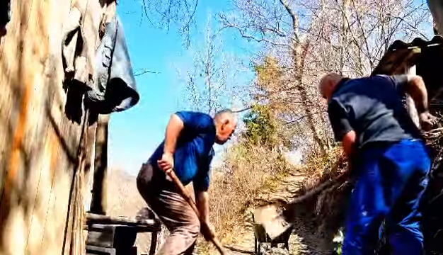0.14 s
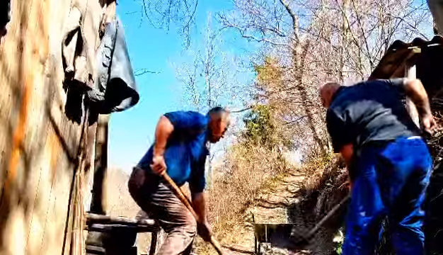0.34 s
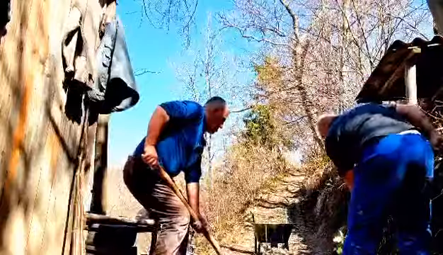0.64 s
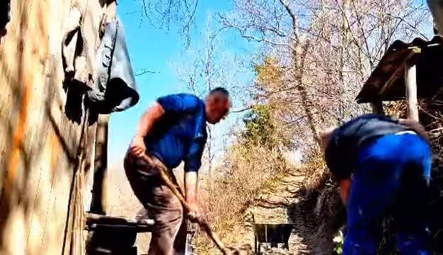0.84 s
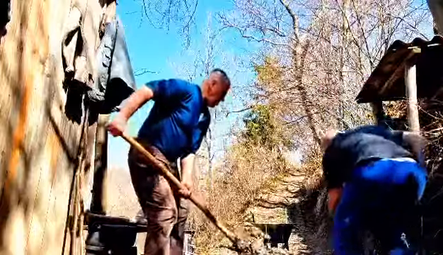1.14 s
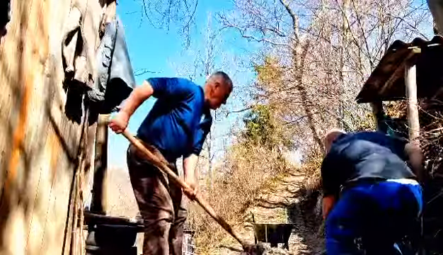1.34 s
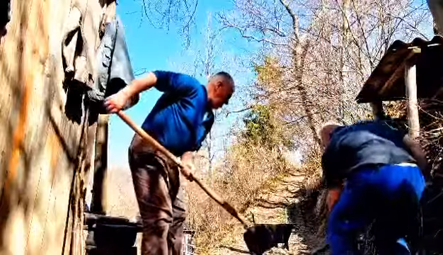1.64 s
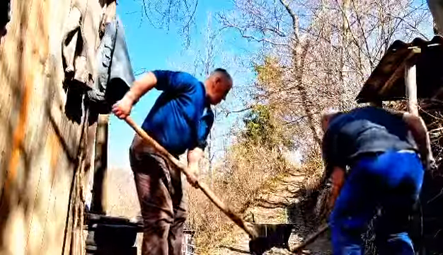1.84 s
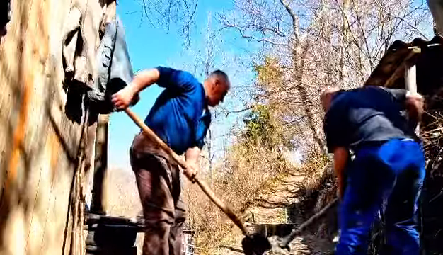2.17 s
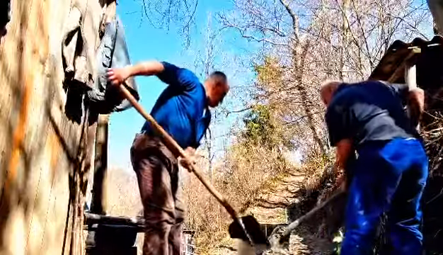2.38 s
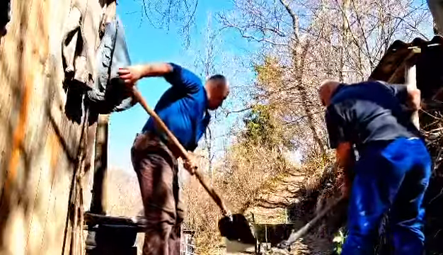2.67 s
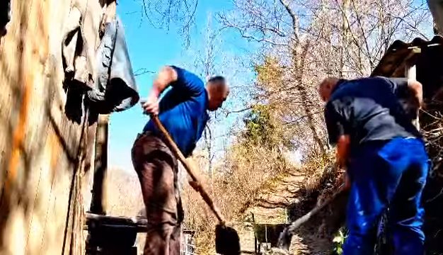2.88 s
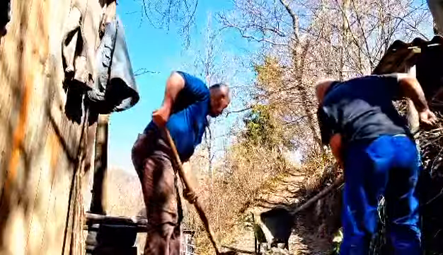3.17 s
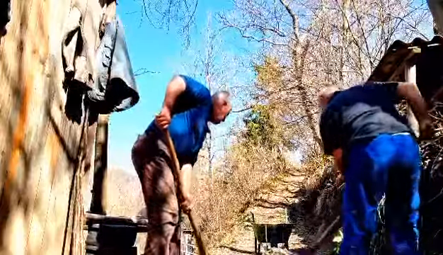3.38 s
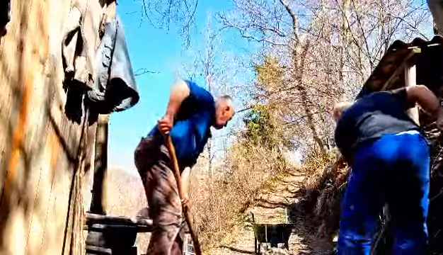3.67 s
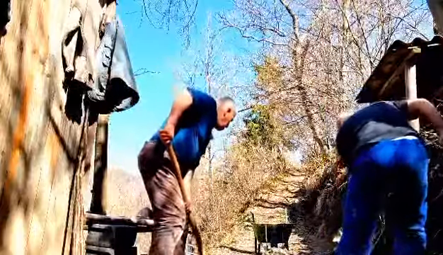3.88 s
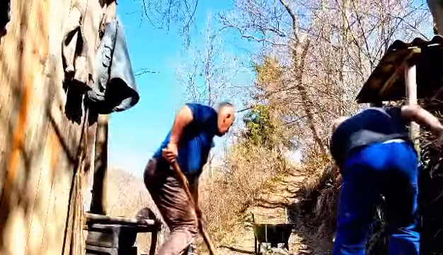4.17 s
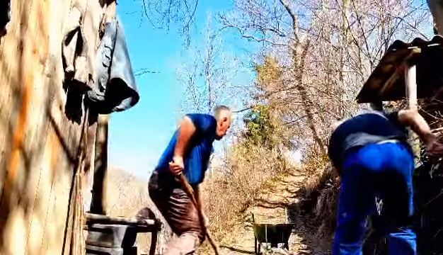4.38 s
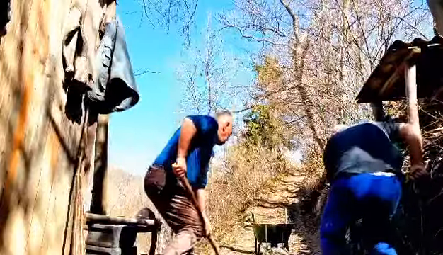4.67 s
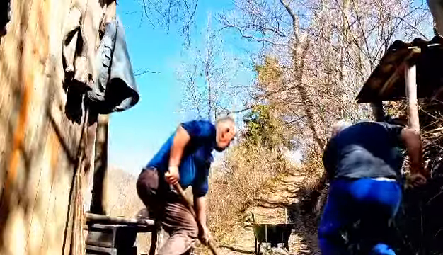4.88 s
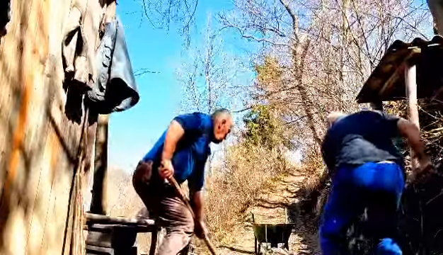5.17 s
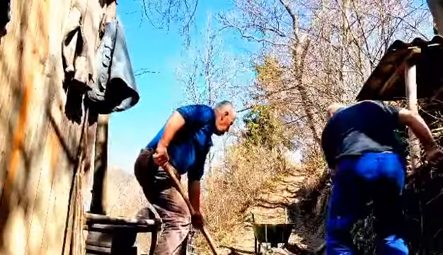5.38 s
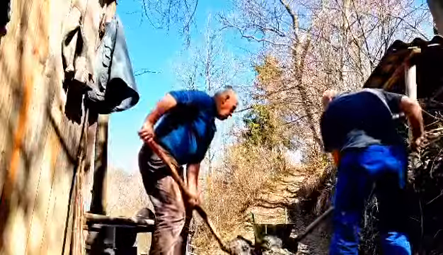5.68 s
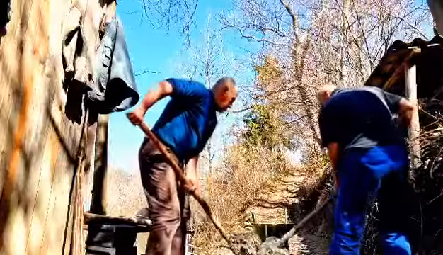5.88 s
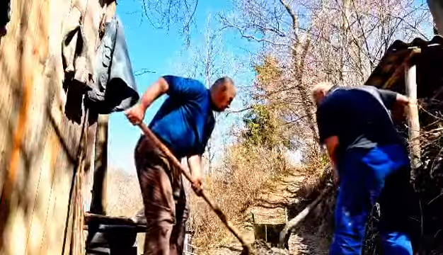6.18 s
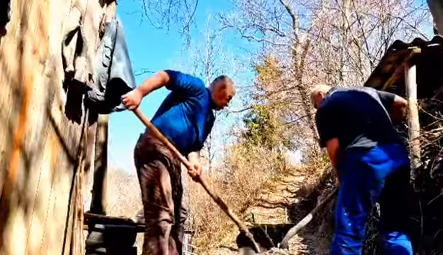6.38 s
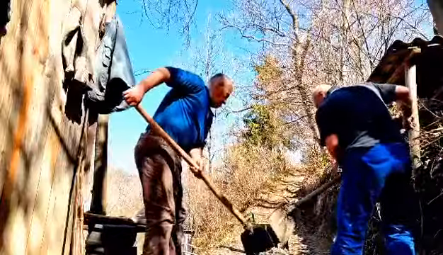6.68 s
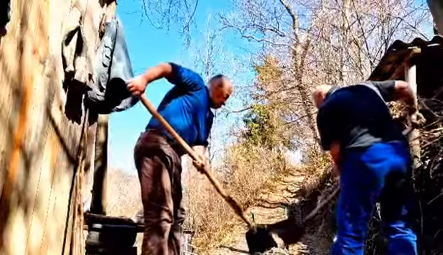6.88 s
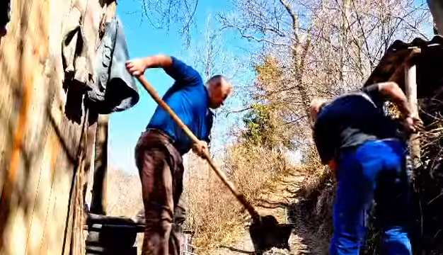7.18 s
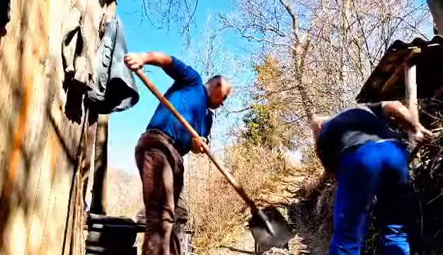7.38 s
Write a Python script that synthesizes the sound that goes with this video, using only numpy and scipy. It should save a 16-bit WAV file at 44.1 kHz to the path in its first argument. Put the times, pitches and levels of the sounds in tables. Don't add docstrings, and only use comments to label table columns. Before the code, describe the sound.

Gritty metal scrapes in short, uneven strokes: damped blades bite into wet concrete and skim across hard ground. Pebbles click and knock, and two blades meet in one brief clang. The work pauses, resumes with duller, longer, loaded scrapes, lulls again, then turns quickly with thuddy knocks. Outdoors near a wall, heard close on a small stereo microphone over very quiet low rumble and air.

```python
import sys
import numpy as np
from scipy import signal
from scipy.fft import rfft, irfft, next_fast_len
from scipy.io import wavfile

SR = 44100
rng = np.random.default_rng(int(sys.argv[2]) if len(sys.argv) > 2 else 0)


def put_to_file(sound):
    columns = np.atleast_2d(sound).T
    safe = np.clip(columns, -1, 1)
    whole_steps = np.round(safe * 32767)
    wavfile.write(sys.argv[1], SR, whole_steps.astype(np.int16))


def rack_gain(trim_db):
    fader = np.asarray(trim_db, float)
    return 10 ** (fader / 20)


N = 332073
SLOW = 20
N_SLOW = N // SLOW + 1


def at_hz(points, hz):
    points_hz, points_db = np.array(points).T
    return np.interp(np.log(hz + 1), np.log(points_hz + 1), points_db)


def drift(rate_hz):
    r = np.exp(-2 * np.pi * SLOW * rate_hz / SR)
    settle = 3000
    slow = signal.lfilter([1], [1, -2 * r, r * r], rng.standard_normal(N_SLOW + settle))[settle:]
    return slow / slow.std()


def held(slow_db):
    return np.repeat(rack_gain(slow_db), SLOW)[:N]


def band(x, low_hz, high_hz):
    return signal.sosfilt(signal.butter(3, [low_hz, high_hz], "band", fs=SR, output="sos"), x)


def flat_gain(low_hz, high_hz):
    return np.sqrt(SR / 2 / (high_hz - low_hz))


def ringing(strikes, hz, t60_s):
    r = rack_gain(-60 / (t60_s * SR))
    w = 2 * np.pi * hz / SR
    return signal.lfilter([0, np.sin(w)], [1, -2 * r * np.cos(w), r * r], strikes)


# (frequency [Hz], density [dB per Hz])
AIR_SPECTRUM = [(12, -50.5), (20, -16), (74, -0.5), (156, -13), (194, -12), (318, -23.5), (396, -38),
                (430, -92), (666, -25), (723, -48), (8740, -46.5), (12100, -46.5), (13900, -54)]


def air():
    hz = np.fft.rfftfreq(N, 1 / SR)
    noise = irfft(rfft(rng.standard_normal((2, N))) * rack_gain(at_hz(AIR_SPECTRUM, hz)), N)
    return rack_gain(-64) * held(0.5 * drift(0.34)) * noise / noise[0].std()


def wall(x):
    out = x.copy()
    for lag_s, db in ((0.0065, -14.5), (0.017, -24), (0.031, -18)):
        lag = round(lag_s * SR)
        out[:, lag:] += rack_gain(db) * band(x[::-1, :-lag], 240, 5000)
    return out


# (time [s], level [dB])
THUDS = [
    (1.4, -35),
    (2.506, -27.5),
    (3.794, -35.5),
    (6.368, -24.5),
]
# (frequency [Hz], level [dB], t60 [s])
HEAP_MODES = [(330, -3, .045), (560, -1.5, .04), (800, -1.5, .04), (1120, 1.5, .045), (1400, -1.5, .035)]


def thuds():
    out = np.zeros((2, N))
    for k, (hz, db, t60_s) in enumerate(HEAP_MODES):
        pushes = np.full(N, 1e-18)
        for s, thud_db in THUDS:
            at = round((s + 0.0006 * k) * SR)
            pushes[at] = (-1) ** k * rack_gain(db + thud_db - 6)
        out += ringing(pushes, hz, t60_s)
    return band(out, 240, 1500)


CLANG_S = [2.5045]
# (frequency [Hz], level [dB], t60 [s])
STEEL_MODES = [(400, -8, .06), (1270, -10, .16), (1195, -15, .07), (1590, -12, .05), (2905, -6, .1),
               (2790, -10, .07), (3430, -11, .07)]


def clang():
    strikes = np.full((2, N), 1e-18)
    strikes[:, [round(s * SR) for s in CLANG_S]] = rack_gain(-22)
    out = np.zeros((2, N))
    for hz, db, t60_s in STEEL_MODES:
        side = rng.choice([-1, 1])
        out += rack_gain(db) * ringing(strikes * [[1], [side]], hz, t60_s)
    return out


def blade(force, part, sharpen, wander_db, pitch_hz=1000, hollow=np.zeros(N_SLOW)):
    (low_hz, high_hz, bed_db), modes = part
    bed_db = bed_db - 18 * hollow
    mode_db = [db - 90 * hollow * np.abs(np.log2(hz / pitch_hz)) for hz, _, db in modes]
    power = rack_gain(bed_db) ** 2 * (high_hz - low_hz)
    for db, (_, width_hz, _) in zip(mode_db, modes):
        power = power + rack_gain(db) ** 2 * width_hz * np.pi / 2
    even_db = 10 * np.log10(SR / 2 / power)
    out = band(force * rng.choice([-1, 1], N) * held(bed_db + even_db), low_hz, high_hz)
    for k, ((hz, width_hz, _), db) in enumerate(zip(modes, mode_db)):
        r = np.exp(-np.pi * width_hz / sharpen / SR)
        gain = (-1) ** k * np.sqrt(sharpen) * (1 - r * r) / 2
        drive = force * held(db + even_db + wander_db * drift(6.6)) + 1e-18
        out += signal.lfilter([gain, 0, -gain], [1, -2 * r * np.cos(2 * np.pi * hz / SR), r * r], drive)
    top_hz = max(high_hz, hz + 2 * width_hz)
    return band(out, 0.94 * low_hz, 1.234 * top_hz)


def damped_tip(x, tip_db):
    low = signal.sosfilt(signal.butter(3, 3560, "low", fs=SR, output="sos"), x)
    high = signal.sosfilt(signal.butter(3, 3560, "high", fs=SR, output="sos"), x)
    return low + held(tip_db) * high


# (low [Hz], high [Hz], level [dB])
FINEST_BANDS = [(7640, 10570, -13.5), (11730, 13100, -19.5)]


def finest(force):
    return sum(rack_gain(db) * flat_gain(low, high) * band(force, low, high) for low, high, db in FINEST_BANDS)


# (frequency [Hz], width [Hz], level [dB])
SLOSH = (296, 400, -2.5), [(335, 235, -2.5), (424, 90, 4.5), (476, 95, 3.5), (726, 41, 3)]
BOWL = (800, 1600, -3), [(860, 60, -3), (950, 55, 0), (1060, 60, 0), (1150, 60, -1), (1270, 60, 0),
        (1380, 60, -1), (1560, 90, -5)]
EDGE = (1700, 4320, -2.3), [(2190, 44, -4.5), (2347, 110, -1), (2820, 300, -0.5), (2960, 33, 5),
        (3210, 140, -24), (4370, 190, -12.5)]
SAND = (4780, 7250, -0.61), [(4680, 76, -1.5), (5600, 110, -2.5), (5834, 59, -1), (6426, 81, -4),
        (7156, 81, 0.5)]
# (time [s], peak [dB], thump [dB], brightness [dB])
KNOCKS = [(0.702, -56, 8.5, 2), (1.397, -40.5, -7, 0), (1.648, -31, -34, -15), (1.899, -32.5, -35, -14),
          (1.985, -47, -38, 13), (2.075, -26, -43, -5), (2.24, -22.5, -46, -4), (2.504, -15, -38, -12),
          (2.507, -16, -45, -14.5), (2.521, -33, -16, 4.5), (2.729, -42, -14, -23),
          (3.512, -52.5, -35, -15), (3.551, -48, -28, -36.5), (3.578, -53, -32, -30),
          (3.791, -25, -35, -18.5), (3.899, -41, -6.5, -14), (3.92, -36, -11, -1.5),
          (4.429, -45.5, -20, 8.5), (4.687, -27, -36, -39), (4.718, -39, -24, -26), (5.748, -59, -30, 14.5),
          (5.804, -48, -29, -14.5), (6.092, -31, -40, -5), (6.369, -33, -15, -28), (6.392, -29, -48, -14),
          (6.498, -29, -40, -26), (6.583, -25.5, -41, -23), (6.662, -31, -52, -32)]


def knocks():
    crunch, bright, push = np.zeros((3, 2, N))
    t = np.arange(round(0.25 * SR)) / SR
    crunch_db = -60 * t / 0.033
    onset = np.minimum(t / 0.0007, 1)
    thump = np.sin(2 * np.pi * 125 * t) * rack_gain(-60 * t / 0.063) * np.minimum(t / 0.011, 1)
    for s, db, thump_db, bright_db in KNOCKS:
        at = round(s * SR)
        span = slice(at, at + len(t))
        burst = rack_gain(db + crunch_db) * onset * rng.standard_normal((2, len(t)))
        crunch[:, span] += burst
        bright[:, span] += rack_gain(bright_db) * burst
        push[:, span] += rack_gain(db + thump_db) * thump
    levels = ((SLOSH, -20), (BOWL, -14), (EDGE, -9))
    ring = sum(rack_gain(db) * blade(crunch, part, 2.7, wander_db=0.5) for part, db in levels)
    spray = blade(bright, SAND, 0.88, wander_db=-7.5) + rack_gain(2.5) * finest(bright)
    return damped_tip(ring, np.full(N_SLOW, -5.0)) + rack_gain(-4.5) * spray + rack_gain(10.5) * push


def grit(per_s, spread_db, smooth):
    sizes = rack_gain(spread_db * np.minimum(rng.exponential(1, N), 5)) * (rng.random(N) < per_s / SR)
    clicks = sizes / np.sqrt(np.mean(sizes ** 2)) * rng.standard_normal((2, N))
    return (clicks + smooth * rng.standard_normal((2, N))) / np.sqrt(1 + smooth ** 2)


# (bite [s], lift [s], effort at bite [dB], effort at lift [dB],
# skim [dB]: high skims bright, low digs dull)
CHOPPING = [(0.0, 0.021, -58, -66, 3), (0.095, 0.314, -68.5, -71, -3), (.33, .4, -59.5, -54, -12),
            (.41, .47, -56, -55, -10), (.49, .72, -59, -62.5, -6), (.735, 0.846, -63, -49.5, 2.5),
            (0.882, 0.917, -46, -48.5, 0), (0.943, 1.051, -53, -58.5, -1), (1.078, 1.234, -53, -45, -2.5),
            (1.26, 1.35, -49, -54.5, -3), (1.4, 1.46, -46.5, -56.5, 2), (1.48, 1.52, -59, -56, 2),
            (1.548, 1.663, -46, -43, 4.5), (1.713, 1.84, -47.5, -49, 5), (1.925, 2.003, -47, -47.5, 6.5),
            (2.078, 2.149, -41, -47, 3.5), (2.244, 2.353, -45.5, -52.5, 6), (2.36, 2.412, -48.5, -54, -1.5),
            (2.447, 2.496, -58.5, -51, 2.5), (2.524, 2.57, -49, -56, -0.5), (2.624, 2.7, -50, -48, 3.5),
            (2.72, 2.766, -44, -53.5, -3), (2.81, 2.83, -65, -50, -14), (2.853, 2.92, -53.5, -59, 3.5)]
DIGGING = [
    (3.432, 3.44, -68.5, -70.5, -9),
    (3.568, 3.618, -60, -58, 2.5),
    (3.64, 3.765, -59.5, -53, 4),
]
HAULING = [(2.982, 3.305, -76, -78, 2.5), (3.797, 3.931, -46, -47, -2.5), (3.955, 4.055, -50, -44.5, -3),
           (4.079, 4.12, -41, -39.5, -8.5), (4.138, 4.26, -44.5, -42.5, -5.5),
           (4.287, 4.404, -43.5, -44.5, -5), (4.425, 4.452, -47, -48.5, -1.5),
           (4.493, 4.717, -49.5, -45.5, -2.5), (4.723, 4.838, -44, -59.5, -4), (4.89, 5.04, -68, -64, -6),
           (5.058, 5.07, -58.5, -59.5, -14), (5.09, 5.56, -65, -64.5, -3), (5.588, 5.866, -77.5, -72.5, 5)]
TURNING = [(5.883, 5.944, -54.5, -49.5, -1), (5.935, 6.045, -57.5, -51.5, -1.5),
           (6.109, 6.124, -42.5, -43.5, 3), (6.128, 6.23, -50, -55, -2.5), (6.241, 6.3, -51, -38.5, -2),
           (6.316, 6.352, -44.5, -43, 1), (6.364, 6.423, -39, -47, -0.5), (6.476, 6.53, -51, -46.5, -1.5),
           (6.548, 6.579, -47.5, -44, 0.5), (6.675, 6.749, -47, -50, 2), (6.792, 6.908, -56.5, -43.5, 1),
           (6.927, 7.274, -47, -51.5, 1.5), (7.3, 7.353, -53.5, -64, -1), (7.38, 7.498, -80, -81.5, 7),
           (7.529, 7.6, -59.5, -58, -2)]
SAND_DB = [-6, -17.5, -6, -4.5]
# (level [dB], skim [dB], slosh [dB])
SETTLING = (-83.5, 1.06, 5.6)


def strokes(t, slosh_db):
    bite_db_per_s, lift_db_per_s, sand_per_skim = 506, 382, 1.81
    bouts = (CHOPPING, DIGGING, HAULING, TURNING)
    bite, lift, bite_db, lift_db, skim = np.vstack(bouts).T[:, :, None]
    sand_db = np.repeat(SAND_DB, [len(bout) for bout in bouts])[:, None] + sand_per_skim * skim
    along = np.clip((t - bite) / np.maximum(lift - bite, 0.002), 0, 1)
    effort = bite_db + along * (lift_db - bite_db)
    effort = effort - bite_db_per_s * np.maximum(bite - t, 0) - lift_db_per_s * np.maximum(t - lift, 0)
    rest_db, rest_skim, rest_slosh = SETTLING
    levels = []
    for db, rest in ((0, 0), (slosh_db, rest_slosh), (skim, rest_skim), (sand_db, rest_skim)):
        power = np.sum(rack_gain(2 * (effort + db)), axis=0) + rack_gain(2 * (rest_db + rest))
        levels.append(10 * np.log10(power))
    return levels


# (time [s], favoured pitch [Hz], hollowness [0-1], slosh against the bowl [dB])
LOAD = [(0.0, 1030, 0, -3.5), (.32, 940, 0.9, -7.5), (.48, 973, .8, -12), (.66, 1000, 0.46, 0),
        (.92, 910, 0.43, -7.5), (1.22, 1110, 0.17, 2.5), (1.7, 1130, 0, -7.5), (2.12, 1320, 0.34, -2.5),
        (2.3, 1330, 0.22, -6.5), (2.9, 1200, 0, -6.5), (3.2, 1170, 0.02, -10.5), (3.58, 1317, 0.2, -15),
        (4.2, 993, 0.25, -12), (4.42, 846, .5, -8.5), (4.72, 1100, .15, -2.5), (5.2, 970, 0.52, -3.5),
        (6.1, 1230, .22, -8.5), (7.53, 1220, 0.3, -7)]
# (low [Hz], high [Hz], level against the slosh [dB])
GROUND = (80, 255, -14.5)


def scraping():
    t = np.arange(N_SLOW) * SLOW / SR
    load_s, *columns = np.array(LOAD).T
    pitch_hz, hollow, slosh_db = (np.interp(t, load_s, column) for column in columns)
    bowl_db, slosh_db, edge_db, sand_db = strokes(t, slosh_db)
    force = grit(per_s=2500, spread_db=0.0, smooth=1.0) * held(0.63 * drift(25))
    out = finest(force * held(sand_db + 1.4 * drift(29)))
    out += blade(force * held(bowl_db + 0.8 * drift(15)), BOWL, 0.81, 2.3, pitch_hz, np.clip(hollow, 0, 1))
    for part, db, wander_db in ((SLOSH, slosh_db, 2.5), (EDGE, edge_db, 2.5), (SAND, sand_db, 2.6)):
        sound = blade(force * held(db + 1.0 * drift(27)), part, 0.81, wander_db)
        if part is EDGE:
            sound = damped_tip(sound, 2.5 + 0.57 * (sand_db - edge_db))
        out += sound
    low_hz, high_hz, db = GROUND
    return out + flat_gain(low_hz, high_hz) * band(force * held(slosh_db + db), low_hz, high_hz)


# (frequency [Hz], level [dB])
WIDTH = [(60, -15), (110, -14), (200, -10.5), (360, -10.5), (670, -4.5), (1210, -8.5), (2220, -0.5),
         (4050, -2), (7390, 1.5), (13500, 2.5)]
# (frequency [Hz], level [dB])
LEAN = [(60, -0.5), (110, -2.5), (200, -1.5), (360, -1.5), (670, -2.5), (1210, 0), (2220, 0.5),
        (4050, -1.5), (7390, 1.5), (13500, -0.5)]


def two_ports(x):
    size = next_fast_len(N)
    total, other = rfft(x, size)
    hz = np.fft.rfftfreq(size, 1 / SR)
    lag_share = 0.6
    difference = np.sqrt(1 - lag_share ** 2) * other + 1j * lag_share * total
    difference = difference * rack_gain(at_hz(WIDTH, hz))
    lean = rack_gain(at_hz(LEAN, hz) / 2)
    return irfft(np.array([(total + difference) * lean, (total - difference) / lean]), size)[:, :N]


def scene():
    return two_ports(wall(scraping() + knocks() + clang() + thuds()) + air())


def low_pass(x):
    return signal.sosfilt(signal.butter(12, 14080, fs=SR, output="sos"), x)


def record(dry):
    return low_pass(dry)


dry = scene()
out = record(dry)
put_to_file(out)
```